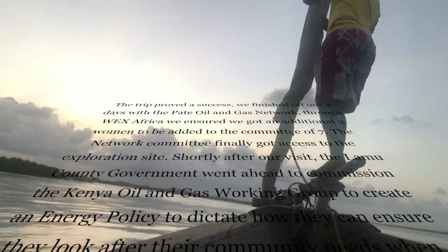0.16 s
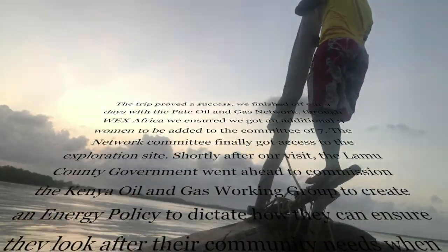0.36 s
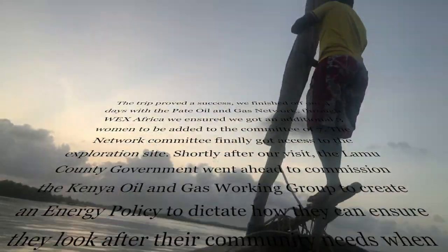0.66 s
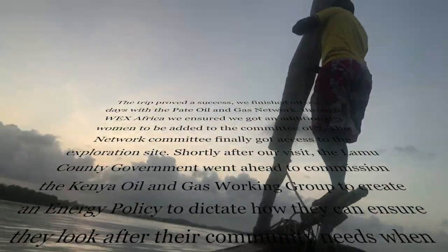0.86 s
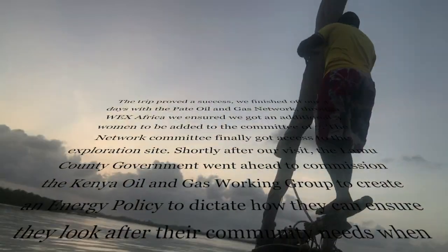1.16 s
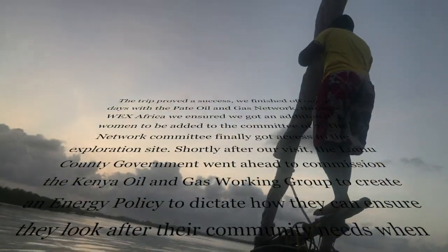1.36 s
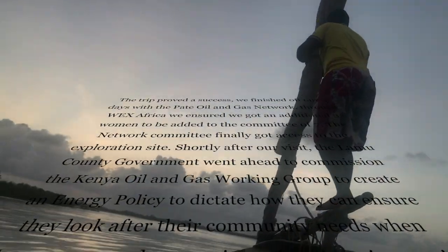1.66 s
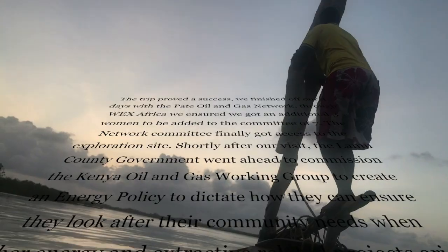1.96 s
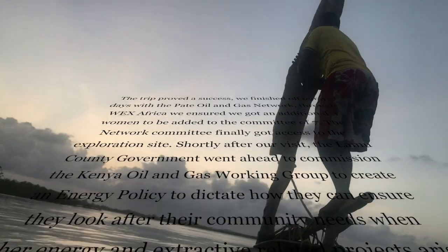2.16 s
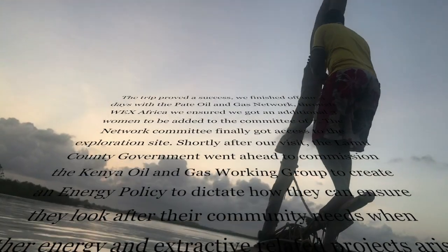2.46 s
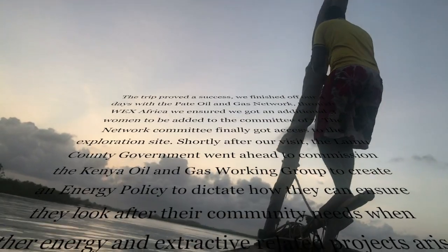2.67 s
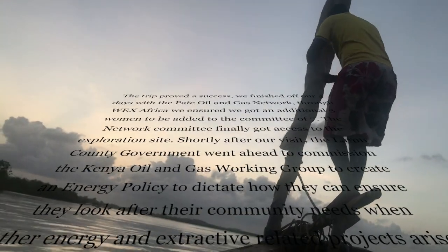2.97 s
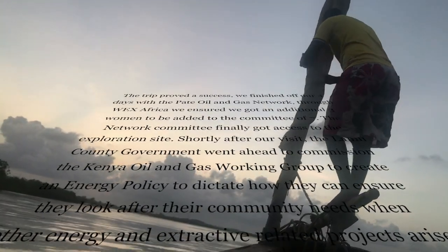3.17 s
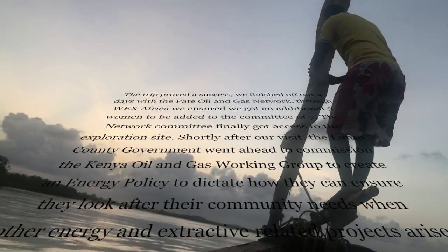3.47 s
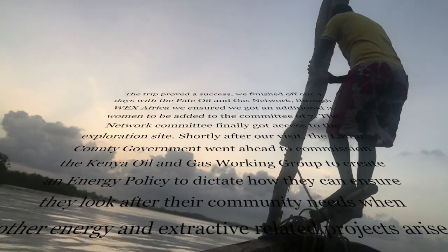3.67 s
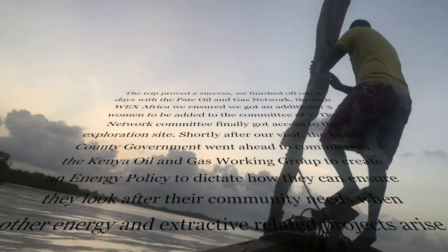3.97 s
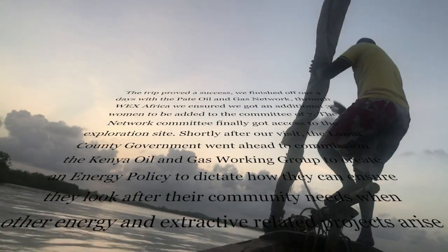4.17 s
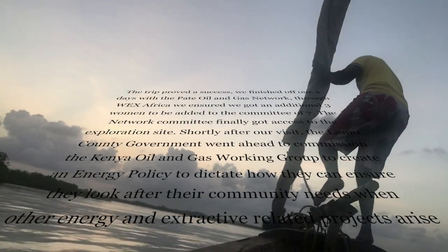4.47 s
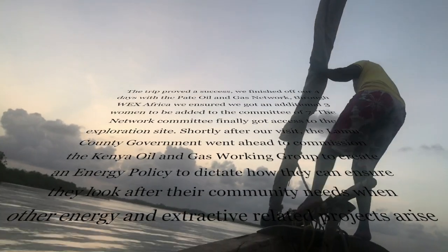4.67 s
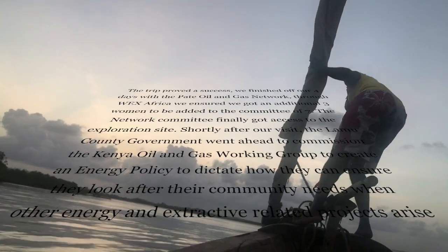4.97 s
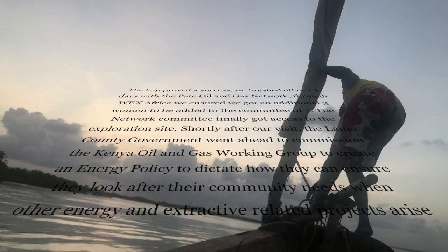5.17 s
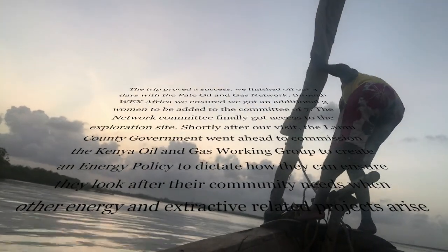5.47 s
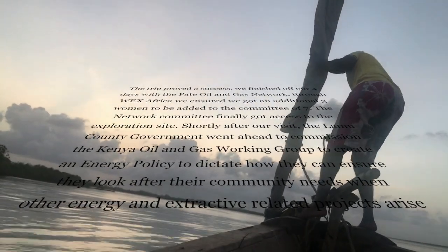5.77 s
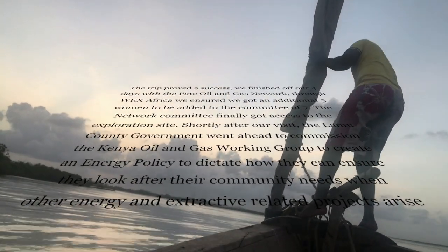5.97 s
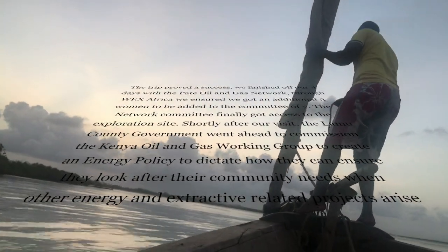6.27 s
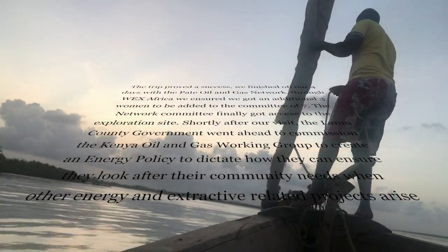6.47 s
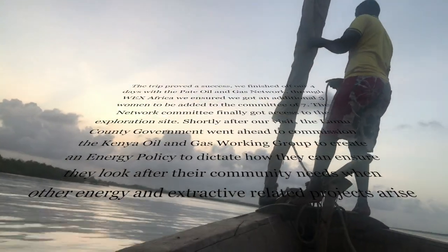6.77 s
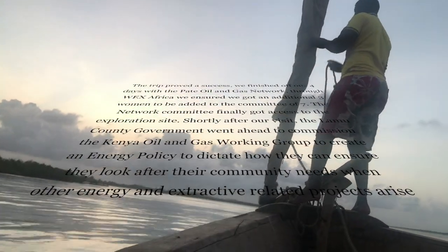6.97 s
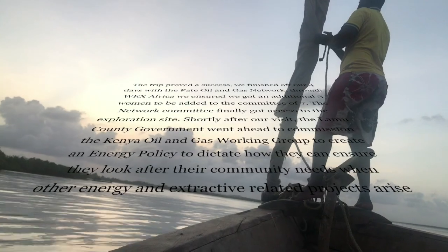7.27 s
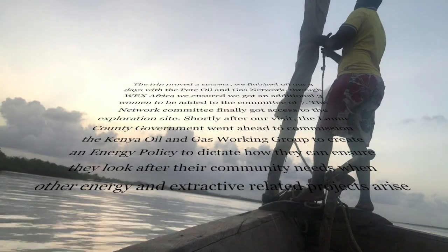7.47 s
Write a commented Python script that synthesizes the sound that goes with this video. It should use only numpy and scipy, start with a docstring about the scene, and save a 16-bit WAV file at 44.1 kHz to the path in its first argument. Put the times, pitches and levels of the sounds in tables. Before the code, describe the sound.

Calm water splashes and gulps against a wooden sailing boat over a steady low rumble of hull and breeze. Rope and timber give sharp, dry snaps, and feet knock on the deck boards, booming in the hull. After about four seconds it settles to a faint rope rub and soft lapping, with one more knock and gulp near the end. The microphone is close by on the open front deck.

```python
"""Rope and timber snap under load as a sailor works a rope at the spar (a pole) of a wooden sailing boat.
Each snap is a fibre letting go and making the spar ring; sliding rope catches and slips on the wood.
He shifts his footing on the bow: his feet knock on the deck boards and boom in the hull.
Calm water splashes along the planks and gulps as trapped air rings, over a fine fizz and a low rumble."""
import sys
import numpy as np
from scipy import signal
from scipy.fft import rfft, irfft
from scipy.io import wavfile
from scipy.ndimage import uniform_filter1d

SR = 44100
rng = np.random.default_rng(int(sys.argv[2]) if len(sys.argv) > 2 else 0)


def dump_mix(stems):
    """Bounce the given channels to the path in sys.argv[1] as a 16-bit WAV at rate SR."""
    frames = np.atleast_2d(stems).T  # one column per channel
    limited = np.clip(frames, -1, 1)  # hard clip at full scale
    pcm = np.round(limited * 32767).astype(np.int16)
    wavfile.write(sys.argv[1], SR, pcm)


N = 335995
T = np.arange(SR // 3) / SR  # time within one event, in seconds

# Tone colours say how strong each frequency is. Columns of all six: f/Hz, level/dB
RUMBLE_TONE = [(11, -58), (18, -11), (43, -0.5), (59, 1.5), (111, -7.5), (129, -8), (184, -11.5),
               (254, -22), (321, -27), (351, -21.5), (385, -39.5), (400, -33.5), (520, -48), (880, -120)]  # hull and breeze
HISS_TONE = [(150, -27.5), (250, 6), (319, -13.5), (354, -5), (386, -9), (519, -6.5), (686, -11),
             (1040, -12.5), (2400, -20), (2860, -18.5), (4820, -21), (8260, -24.5), (10400, -22.5),
             (11900, -23.5), (16000, -28.5)]  # open air
WATER_TONE = [(300, -2), (1000, -6), (2200, 1), (3000, -4.5), (3750, 3.5), (4500, -4.5), (6500, -3.5),
              (8500, -7.5), (10400, -4.5), (12000, -6), (16000, -10)]  # fizz and spray
SCUFF_TONE = [(150, -26), (500, 4), (1200, -7), (1800, 19.5), (2600, 2.5), (5000, -3.5), (15000, -19)]  # a sole on the boards
TICK_TONE = [(1000, -43), (5000, -19), (8300, 2), (10300, 0), (12200, 6.5), (14000, -10), (16000, -3)]  # the bright tip of a snap
CRACK_TONE = [(300, -41), (900, -14), (1500, 3.5), (2200, 10), (5500, -5), (8000, 13.5), (10000, -6),
              (16000, -16)]  # the crack of a snap

# The functions shift the levels below by a few dB. A ring time (t60) is the time to fade by 60 dB.
# water flowing along the hull: t/s, fizz level/dB, lapping level/dB
WATER_FLOW = [(0.0, -60.5, -57), (1.14, -61.5, -57.5), (1.25, -60, -49), (1.59, -60, -60),
              (2.2, -64.5, -58.5), (3.96, -65.5, -61), (4.23, -64, -54), (4.74, -66, -63.5),
              (7.6, -65.5, -60.5)]
# the larger swishes: water splashing on the planks, or a sole brushing the boards as a foot lands: t/s,
# level/dB, decay time/s
BIG_SWISHES = [(0.073, -55, 0.0089), (0.343, -56.5, 0.11), (0.453, -42.5, 0.027), (0.563, -54, 0.0091),
               (0.628, -52, 0.013), (1.073, -53.5, 0.15), (1.122, -41, 0.034), (1.629, -54.5, 0.012),
               (2.797, -56, 0.0092), (3.463, -46.5, 0.0061), (4.105, -56.5, 0.022), (4.175, -55.5, 0.0073),
               (4.443, -60.5, 0.014), (4.84, -63.5, 0.013), (7.577, -56.5, 0.013)]
# air pockets closing against the hull: t/s, level/dB, f/Hz
AIR_POCKETS = [(0.194, -40, 440), (0.561, -34, 390), (0.697, -39.5, 500), (0.866, -33.5, 574),
               (1.093, -37, 430), (1.132, -36, 355), (5.0089, -51.5, 1310), (5.413, -46.5, 484),
               (7.3206, -32.5, 1045)]
# rope sliding over wood: t/s, length/s, level/dB, f/Hz
ROPE_SLIDES = [(0.897, .65, -62.5, 3620), (4.269, 0.38, -65, 1280), (4.311, 0.26, -65, 2550),
               (6.547, 0.041, -51, 2850)]
# feet landing on the deck: t/s, slap level/dB, thud level/dB, thud f/Hz
STEPS = [(0.002, -50.5, -37, 108), (0.79, -69, -39.5, 65), (1.258, -39, -42.5, 195),
         (1.287, -37.5, -31.5, 150), (1.429, -58, -39.5, 35.7), (1.64, -38, -57, 800),
         (2.103, -36.5, -39, 172), (2.494, -41.5, -29.5, 125), (2.538, -70, -41, 110),
         (2.772, -51, -42, 220), (2.795, -44, -37.5, 54.7), (2.823, -44.5, -38, 50), (3.453, -43, -45, 160),
         (3.506, -41.5, -44, 44.8), (3.524, -40, -52, 400), (3.67, -51, -42, 100), (3.735, -53.5, -42, 45),
         (3.912, -43.5, -32, 80.6), (4.009, -50.5, -43.5, 80), (4.102, -44.5, -24, 45),
         (4.109, -42.5, -33.5, 400), (4.176, -49, -37, 40.7), (4.225, -50.5, -39.5, 45),
         (4.253, -53, -46, 300), (7.321, -36, -38, 594)]
# the notes the boat rings with: f/Hz, level/dB, ring time/s
BOAT_NOTES = [(36, -2, 0.23), (57.3, 0, 0.22), (87, -8.5, 0.16), (116.7, 2, 0.15), (171, 8, 0.28),
              (217.6, -2.5, 0.082), (263, -3, 0.17), (288.3, -3.5, 0.12), (355, 1.5, 0.11), (402, 1, 0.077),
              (462, -1, 0.22), (531.5, -0.5, 0.061), (686, -2, 0.046), (826, -1.5, 0.015),
              (971, 1.5, 0.022), (1137, 4.5, 0.013), (1274, 5.5, 0.024), (1547, 5, 0.017), (1665, 1, 0.022),
              (1930, -42, 0.038)]
# ranges of the spot underfoot, the planks, the beams and the hull: lowest f/Hz, highest f/Hz
BOAT_PARTS = [(700, 2200), (280, 700), (90, 280), (20, 90)]
# the notes the spar rings with: f/Hz, level/dB, ring time/s
SPAR_NOTES = [(1090, -12, 0.0049), (1660, -6, 0.0084), (1850, 1.5, 0.0073), (2205, 2, 0.014),
              (2840, -1, 0.009), (3600, -1, 0.011), (4480, 5, 0.0064), (4570, 7, 0.0016), (5700, 2, 0.0033),
              (6600, -1.5, 0.01), (8100, 3, 0.0015), (12450, 5.5, 0.0011)]
# rope and timber letting go: t/s, level/dB, centre f/Hz, width/octaves, tick level against the wood/dB
FIBRE_SNAPS = [(0.076, -43.5, 8500, 0.68, 4), (0.776, -20.5, 5580, 0.33, -8.5),
               (0.8119, -27, 2730, 0.77, 2.5), (0.913, -35.5, 12400, 0.22, -6),
               (2.325, -23.5, 4400, 0.97, -1.5), (2.329, -26.5, 6300, 1.4, -19),
               (2.3462, -31, 4800, 0.54, -24), (2.381, -29.5, 2550, 0.8, -10),
               (2.6591, -16.5, 2830, 0.56, -27), (2.85, -35.5, 3560, 0.53, -5),
               (3.4274, -20, 3940, 0.8, -23), (3.4355, -27.5, 3150, 1, -22), (4.0865, -35, 2200, 0.22, -14),
               (4.0866, -35, 5700, 0.23, -7), (7.568, -39, 4160, 1.1, -1.5)]


def undb(db):
    """Turn decibels into a number to multiply by."""
    return 10 ** (np.asarray(db) / 20)


def unit(x):
    """Scale to an average strength (rms) of 1."""
    return x / np.sqrt(np.mean(x ** 2))


def burst(x, db, size):
    """Scale so that the loudest stretch of `size` samples has this level."""
    return x * undb(db) / np.sqrt(uniform_filter1d(x ** 2, size).max())


def add(out, s, x):
    """Mix x into out, starting at s seconds."""
    i = max(0, int(s * SR))
    out[i:i + len(x)] += x[:max(0, N - i)]


def curve(rows):
    """Join the values in each column of a table by straight lines in time."""
    times, *columns = np.transpose(rows)
    return [np.interp(np.arange(N) / SR, times, column) for column in columns]


def colour(x, points, size=512):
    """Give x a tone colour by turning each frequency up or down."""
    hz, db = np.transpose(points)
    filter_hz = np.arange(size // 2 + 1) * SR / size
    gain = undb(np.interp(np.log(filter_hz + 1), np.log(hz), db))
    # these steps keep the filter from sounding before the click that sets it off
    cepstrum = irfft(np.log(gain))
    cepstrum[1:size // 2] *= 2
    cepstrum[size // 2 + 1:] = 0
    return signal.fftconvolve(x, irfft(np.exp(rfft(cepstrum))))[:len(x)]


def cut(x, hz, kind):
    """A gentle filter: "lowpass" keeps what is below hz, "highpass" what is above."""
    return signal.sosfilt(signal.butter(2, hz, kind, fs=SR, output="sos"), x)


def ring(x, hz, t60):
    """One note that is set ringing by x and dies away."""
    pole = np.exp((2j * np.pi * hz - np.log(1000) / t60) / SR)
    return signal.lfilter([1], [1, -pole], x).imag


def grains(n, per_s, spread_db):
    """Tiny clicks of uneven size at random moments."""
    chance, size = rng.random(n), rng.standard_normal((2, n))
    return (chance < per_s / SR) * np.sign(size[0]) * undb(spread_db * size[1])


def wander(per_s):
    """A smooth random drift, typically about 1 above or below zero."""
    hold = int(SR / per_s)
    stairs = np.repeat(rng.standard_normal(N // hold + 1), hold)
    return unit(uniform_filter1d(uniform_filter1d(stairs, hold), hold))[:N]


def swell_and_fade(rise_s, decay_s):
    """How the loudness of one event grows and dies away."""
    return (1 - np.exp(-T / rise_s)) * np.exp(-T / decay_s)


def echoes(x, t60, db):
    """Add a short blur of reflections from deck, spar and water."""
    tail = rng.standard_normal(len(T)) * swell_and_fade(0.0034, t60 / np.log(1000))
    tail = colour(tail, [(100, -2), (2000, 0), (4500, 0.5), (9000, 8), (16000, -0.5)])
    return x + undb(db) * signal.fftconvolve(x, tail / np.sqrt(np.sum(tail ** 2)))[:N]


def open_water(mean_rumble_db=-45, follows_fizz=0.17, heave_db=0.63):
    """Hull and breeze rumble as the boat heaves, with distant hiss, a hollow hum and soft lapping."""
    fizz_db, lap_db = curve(WATER_FLOW)
    rumble_db = mean_rumble_db + follows_fizz * (fizz_db - fizz_db.mean()) + heave_db * wander(1.3)
    rumble = unit(colour(rng.standard_normal(N), RUMBLE_TONE, size=16384))
    rumble *= undb(rumble_db + wander(7.4))
    hiss = unit(colour(rng.standard_normal(N), HISS_TONE, size=2048)) * undb(-60)
    lap_tone = [(150, -6), (350, 2), (700, -11), (1400, -8), (2200, -9.5), (5000, -37)]
    lapping = unit(colour(grains(N, per_s=1500, spread_db=1.7), lap_tone))
    hum = unit(ring(rng.standard_normal(N), hz=374, t60=0.091)) * undb(-67)
    return rumble + hiss + hum + lapping * undb(lap_db - 1.24 + 2 * wander(14))


def wash(trim_db=1.55, droplet_db=-6, slack_db=-64, floor_db=-78):
    """Water running along the planks makes a fine fizz with single droplets in it."""
    fizz_db = curve(WATER_FLOW)[0] + trim_db
    fizz = unit(colour(grains(N, per_s=7000, spread_db=2.3), WATER_TONE))
    droplet_tone = [(1000, -13), (3700, 4.5), (7000, -5), (12500, 1.5), (16000, -3)]
    droplets = unit(colour(grains(N, per_s=60, spread_db=5), droplet_tone))
    # when the flow is weak, the fizz sinks under the hiss of the open air
    power = np.maximum(undb(2 * fizz_db) - undb(2 * slack_db), undb(2 * floor_db))
    return (fizz + undb(droplet_db) * droplets) * np.sqrt(power) * undb(wander(9.2))


def small_splashes(per_s=3, offset_db=-1, spread_db=0.5, decay_s=0.017):
    """Pick random splashes, louder when the flow is stronger: t/s, level/dB, decay time/s."""
    flow_times, fizz_db, _ = np.transpose(WATER_FLOW)
    when, size = rng.random((int(per_s * N / SR), 2)).T
    times = when * N / SR
    levels = np.interp(times, flow_times, fizz_db) + offset_db + spread_db * (2 * size - 1)
    return [(s, db, decay_s) for s, db in zip(times, levels)]


def splashes(trim_db=5.5):
    """Water hits the planks, or a sole brushes the boards: a quick splat, then a fading shower of tiny clicks."""
    out = np.zeros(N)
    splat = 0.35 * swell_and_fade(0.00055, 0.0016)
    for s, db, decay_s in BIG_SWISHES + small_splashes():
        spray = grains(len(T), per_s=6000, spread_db=1.2) * (swell_and_fade(0.0007, decay_s) + splat)
        add(out, s, burst(colour(spray, WATER_TONE), db + trim_db, size=350))
    return out


def gulps(t60=0.044, glide=-0.26, froth_s=0.034, froth_db=-1, froth_cycles=2.45, trim_db=-5.5):
    """Trapped air rings and sinks slightly in pitch, with smaller bubbles frothing around it."""
    out = np.zeros(N)
    # a softer, deeper pocket follows each one
    followers = [(s + 0.02, db - 7, hz * 0.774) for s, db, hz in AIR_POCKETS]
    for s, db, hz in AIR_POCKETS + followers:
        tone = np.sin(2 * np.pi * hz * T * (1 + glide * T)) * swell_and_fade(0.0013, t60 / np.log(1000))
        stir = rng.standard_normal(len(T)) * swell_and_fade(0.0004, froth_s)
        froth = ring(ring(stir, hz, froth_cycles / hz), hz, froth_cycles / hz)
        add(out, s, burst(unit(tone) + undb(froth_db) * unit(froth), db + trim_db, size=350))
    return out


def rope_rubs(ring_cycles=16, trim_db=-5.5):
    """Rope fibres catch and slip very quickly, which keeps one note of the wood ringing."""
    out = np.zeros(N)
    for s, length_s, db, hz in ROPE_SLIDES:
        n = int(length_s * SR)
        slip_tone = [(0.5 * hz, -24), (0.7 * hz, 0), (1.3 * hz, 0), (2 * hz, -24)]
        slips = colour(grains(n, per_s=2500, spread_db=7.7), slip_tone)
        stroke = np.sqrt(np.abs(np.sin(np.pi * np.arange(n) / n)))
        add(out, s, unit(ring(slips, hz, ring_cycles / hz) * stroke) * undb(db + trim_db))
    return out


def footfall(slap_db, thud_db, thud_hz, scuff_db=-7, settle_s=0.0083, fall_db_per_octave=5):
    """A sole lands and scuffs the boards; the planks answer, then the beams and hull."""
    # the more the thud outweighs the slap, the more slowly the sole lands
    contact_s = 0.013 * 2 ** ((thud_db - slap_db) / 28.5)
    grit = grains(len(T), per_s=3000, spread_db=7) * swell_and_fade(0.0019, 0.66 * contact_s)
    scuff = 3 * (T == 0) + grit  # one sharp click starts it
    out = burst(colour(scuff, SCUFF_TONE), slap_db + scuff_db, size=350)
    # each spot on the deck makes the notes a little different in level and pitch
    spot = rng.standard_normal((len(BOAT_NOTES), 2))
    spot_db, tuning = 2 * spot[:, 0], 1 + 0.042 * spot[:, 1]
    trims_db = (-2.5, 0, -2, 2)  # spot underfoot, planks, beams, hull
    for k, (low, high) in enumerate(BOAT_PARTS):
        part = sum((-1) ** m * undb(note_db + spot_db[m]) * unit(ring(scuff, hz * tuning[m], t60))
                   for m, (hz, note_db, t60) in enumerate(BOAT_NOTES) if low <= hz < high)
        part = cut(part, high, "lowpass")  # the soft sole passes little that is higher
        # the slap drives the top notes; the thud drives the rest, less so far from its own pitch
        octaves_away = abs(np.log2(np.sqrt(low * high) / thud_hz))
        db = slap_db if k == 0 else thud_db - fall_db_per_octave * octaves_away
        part = burst(part, db + trims_db[k], size=300 * (k + 1))
        delay = int(SR * settle_s * min(k, 2) / 2)
        out += np.pad(part, (delay, 0))[:len(T)]
    return out


def footsteps(mean_roll_s=0.045, roll_db=-12, roll_hz=900):
    """Each step lands, then rolls onto the rest of the foot with a duller, softer thud."""
    out = np.zeros(N)
    for s, slap_db, thud_db, thud_hz in STEPS:
        step = footfall(slap_db, thud_db, thud_hz)
        roll = undb(roll_db) * cut(step, roll_hz, "lowpass")
        add(out, s, step)
        add(out, s + mean_roll_s * (0.5 + rng.random()), roll)
    return out


def snaps(crack_db=-8, splinter_s=0.003, detune=0.025, trim_db=1):
    """A fibre of rope or timber lets go with a crack and a bright tick, and the spar rings."""
    out = np.zeros(N)
    for s, db, centre_hz, octaves, tick_db in FIBRE_SNAPS:
        slip = (T == 0) + 0.048 * rng.standard_normal(len(T)) * np.exp(-T / splinter_s)
        wood = 0
        for k, (hz, note_db, t60) in enumerate(SPAR_NOTES):
            # notes near the snap's centre pitch get the hardest push
            push = 0.012 + np.exp(-0.5 * (np.log2(hz / centre_hz) / octaves) ** 2)
            note = unit(ring(slip, hz * (1 + detune * rng.standard_normal()), t60))
            wood += (-1) ** k * push * undb(note_db) * note
        crack = ring(colour(slip, CRACK_TONE), centre_hz, t60=2 / (centre_hz * octaves))
        tick = colour(slip, TICK_TONE)
        snap = burst(wood, 0, size=88) + burst(crack, crack_db, size=88) + burst(tick, tick_db, size=88)
        add(out, s, burst(snap, db + trim_db, size=88))
    return cut(out, 950, "highpass")  # so small a source gives off little bass


def scene():
    """All the sounds meet at one microphone on the front deck."""
    near = echoes(snaps(), t60=0.21, db=-15)
    near += echoes(footsteps(), t60=0.11, db=-10.5)
    near += echoes(splashes() + gulps(), t60=0.29, db=-16.5)
    return (near + rope_rubs() + wash() + open_water())[None]


def record(dry, bass_hz=21, dip_hz=10400, dip_share=0.54, top_hz=15900):
    """The deepest bass fades, the treble has a narrow dip, and nothing sounds above about 16 kHz."""
    x = cut(dry, bass_hz, "highpass")
    notched = signal.lfilter(*signal.iirnotch(dip_hz, 9, fs=SR), x)
    x += dip_share * (notched - x)
    return signal.sosfilt(signal.ellip(8, 0.2, 70, top_hz, fs=SR, output="sos"), x)


dry = scene()
out = record(dry)
dump_mix(out)
```